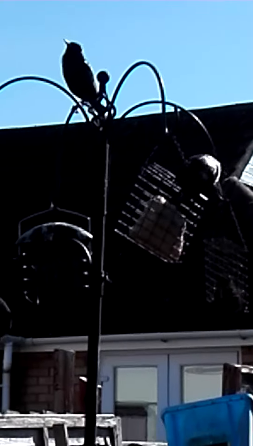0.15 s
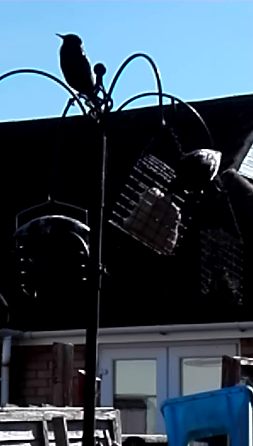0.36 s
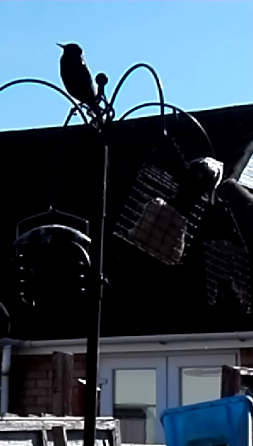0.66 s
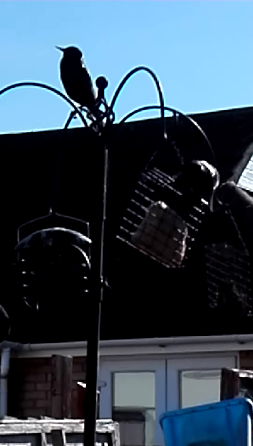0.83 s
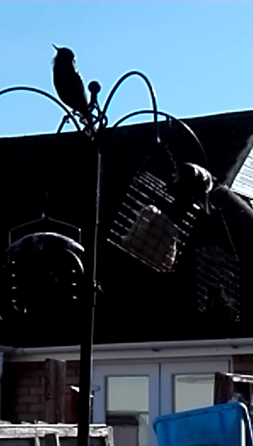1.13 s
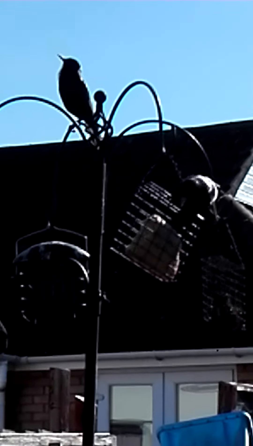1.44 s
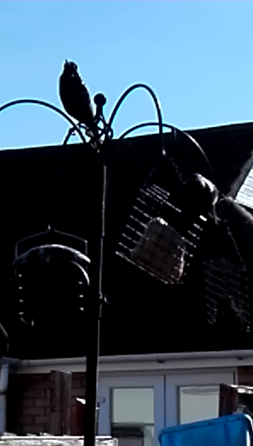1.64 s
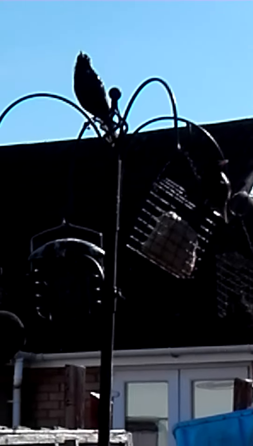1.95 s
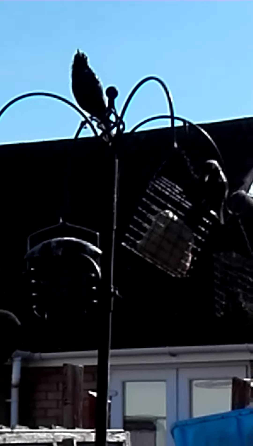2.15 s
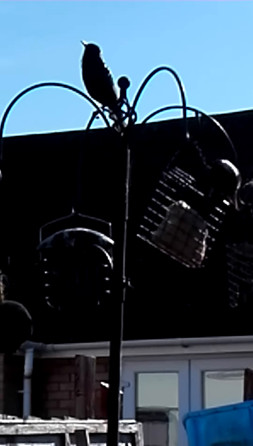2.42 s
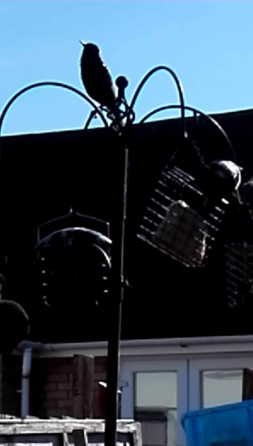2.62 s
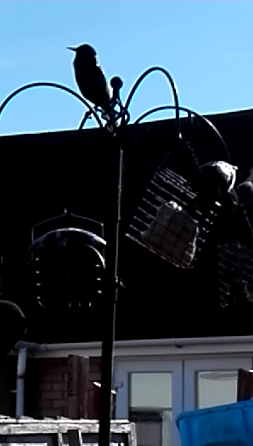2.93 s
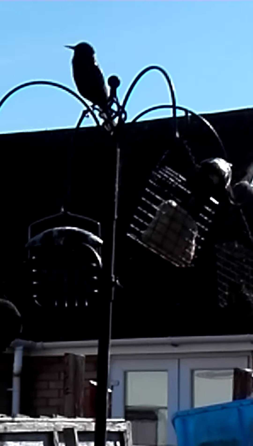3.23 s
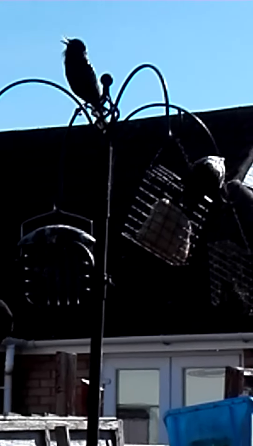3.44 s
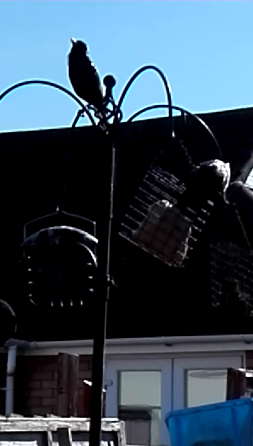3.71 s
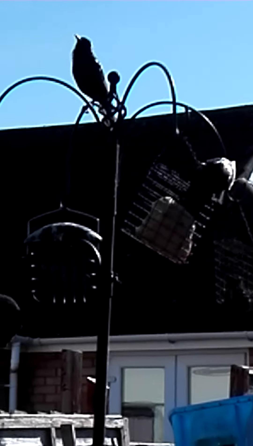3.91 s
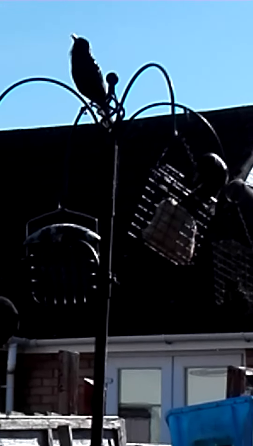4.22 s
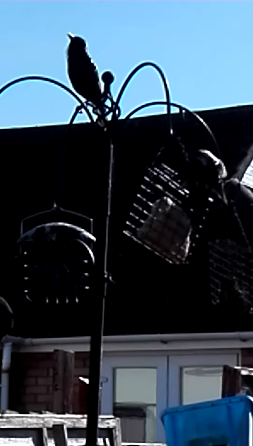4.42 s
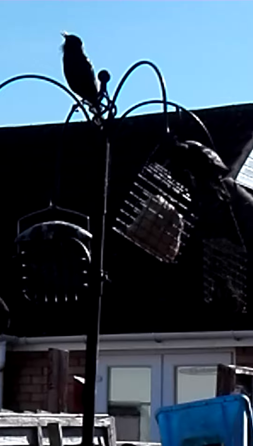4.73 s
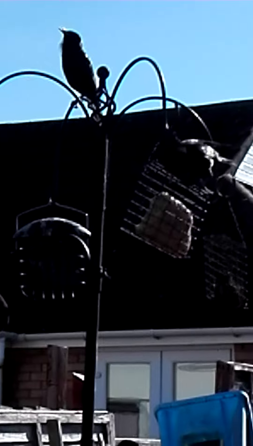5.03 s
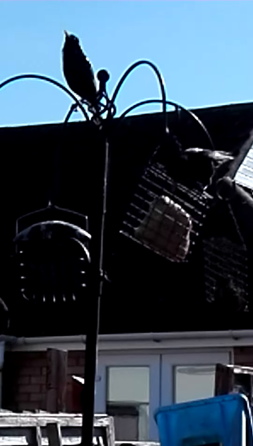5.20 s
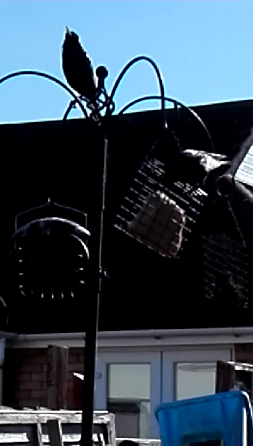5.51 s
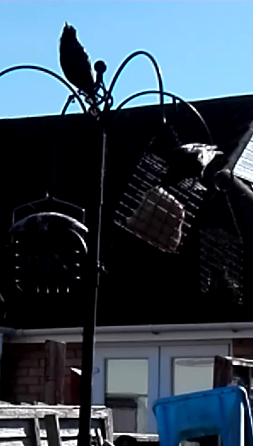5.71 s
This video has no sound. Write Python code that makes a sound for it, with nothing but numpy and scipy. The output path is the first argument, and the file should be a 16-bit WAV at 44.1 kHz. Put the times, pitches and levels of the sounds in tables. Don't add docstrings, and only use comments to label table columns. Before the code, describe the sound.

Sparse starling song outdoors: short chirps, a clear upward whistle, a long thin downward glide ending in dry rattle and a faint hoarse squawk.

```python
import sys
import numpy as np
from scipy import signal
from scipy.io import wavfile
from scipy.ndimage import uniform_filter1d

SR = 44100
rng = np.random.default_rng(int(sys.argv[2]) if len(sys.argv) > 2 else 0)


def how_loud(loudness_db):
    steps = np.asarray(loudness_db, float) / 20
    return 10 ** steps


def dump_mix(stems):
    frames = np.atleast_2d(stems).T
    limited = np.clip(frames, -1, 1)
    pcm = np.round(limited * 32767).astype(np.int16)
    wavfile.write(sys.argv[1], SR, pcm)


N = 258426

# (time [s], spread [s], peak level [dB])
GUSTS = [(0.0, 0.0094, -40), (.2, 0.068, -56.5), (.39, 0.014, -63.5), (.63, 0.036, -56), (.8, 0.033, -60),
         (.9, 0.015, -67), (1.12, 0.049, -58), (1.58, 0.061, -53), (1.97, 0.035, -57), (2.22, 0.025, -61.5),
         (2.5, 0.1, -57), (2.92, 0.045, -68), (3.16, 0.033, -59.5), (3.45, 0.051, -51.5),
         (3.68, 0.069, -59.5), (4.24, 0.072, -56.5), (4.45, 0.021, -65.5), (4.8, 0.054, -57),
         (4.93, .03, -57.5), (5.11, 0.033, -47), (5.24, 0.028, -62), (5.45, 0.053, -49.5),
         (5.56, 0.031, -43), (5.71, 0.027, -50.5), (5.86, 0.055, -53)]
# (time [s], level [dB])
BREEZE = [(0, -64.5), (3.9, -63), (4.6, -57), (5.86, -64.5)]
# (frequency [Hz], level [dB])
TOWN_HUM = [(76, -40.5), (130, -0.5), (280, -10.5), (578, -18), (1000, -12), (2290, -17), (5110, -15.5),
            (14200, -23.5)]
# (frequency [Hz], level [dB])
HISS = [(59, -39), (100, -11.5), (674, -19), (2200, -21.5), (2540, -7.5), (4830, -24.5), (5360, -5),
        (14200, -6.5)]
# (time [s], peak level [dB])
TICKS = [(0.0528, -69), (0.2538, -66), (0.5292, -70), (0.9707, -68), (1.278, -71), (1.3803, -66.5),
         (1.4825, -70), (1.6876, -70), (1.9949, -69), (2.097, -63), (2.7109, -69), (2.8135, -69),
         (2.917, -67), (3.3256, -68)]

# (time [s], pitch [Hz], level [dB])
LOWER_VOICE = [
    [(1.04, 1180, -78), (1.05, 1240, -59), (1.06, 1233, -56.5), (1.068, 1223, -65)],
    [(1.097, 1365, -57), (1.111, 1453, -70), (1.139, 1220, -58.5), (1.158, 1234, -65)],
    [(2.17, 1240, -93), (2.184, 1211, -70), (2.208, 1202, -52), (2.23, 1177, -67.5), (2.33, 1160, -76.5)],
]
# (time [s], pitch [Hz], level [dB])
UPPER_VOICE = [(1.052, 2830, -82), (1.064, 2850, -72), (1.079, 2950, -51), (1.086, 2920, -58),
               (1.093, 3050, -46), (1.102, 3060, -50), (1.114, 3060, -82)]
# (time [s], pitch [Hz], level [dB])
ARCH = [(1.99, 2490, -70.5), (2.062, 2830, -60.5), (2.088, 2945, -52.5), (2.122, 2796, -48.5),
        (2.132, 2771, -34), (2.149, 2714, -32), (2.156, 2668, -39.5), (2.172, 2590, -36.5),
        (2.18, 2530, -51)]
# (time [s], pitch [Hz], level [dB])
RISE = [(3.39, 3337, -73), (3.466, 3437, -35.5), (3.508, 3504, -29.5), (3.562, 3580, -46.5),
        (3.59, 3621, -35), (3.614, 3595, -34.5), (3.63, 3643, -42), (3.818, 3744, -58), (3.833, 3820, -94)]
# (time [s], pitch [Hz], level [dB])
DIVE = [(3.985, 9300, -59.5), (4.011, 9170, -48), (4.093, 8330, -48.5), (4.127, 8210, -44.5),
        (4.218, 7092, -51), (4.25, 6700, -61.5), (4.322, 6470, -62), (4.36, 6310, -75.5), (4.44, 6250, -62)]
GLIDE = [(4.456, 6140, -71.5), (4.518, 5720, -53), (4.559, 5530, -50), (4.632, 5450, -44),
         (4.682, 5336, -55.5), (4.719, 5225, -49.5), (4.957, 4517, -51.5), (5.052, 4213, -40.5),
         (5.1, 4231, -38)]
SINK = [(5.113, 4170, -48.5), (5.267, 3982, -46.5), (5.366, 3785, -50), (5.416, 3722, -43.5),
        (5.469, 3690, -54.5), (5.509, 3482, -42.5), (5.595, 3430, -40.5), (5.645, 3253, -40.5),
        (5.66, 3230, -68)]
FADE = [(5.661, 3238, -59), (5.687, 3170, -53), (5.713, 3156, -60), (5.771, 3234, -57.5),
        (5.805, 3050, -55), (5.859, 3050, -69)]
# (time [s], spread [s], peak level [dB])
OCTAVE = [(2.163, 0.025, -63.5), (3.45, .05, -79.5), (3.556, 0.041, -62.5), (3.74, 0.075, -75.5),
          (4.88, 0.17, -84.5), (5.26, 0.039, -69.5), (5.48, 0.075, -69.5), (5.668, 0.013, -62),
          (5.78, 0.077, -80)]
TWELFTH = [(2.146, 0.012, -86)]
HALF_ORDER = [(2.156, 0.023, -71.5)]

# (time [s], length [s], low edge [Hz], high edge [Hz], level [dB])
PUFFS = [
    (3.385, .05, 4000, 6200, -70),
    (1.27, .03, 3500, 6000, -78),
    (1.058, .012, 1700, 2500, -76),
    (1.835, .03, 1500, 6000, -78),
    (2.66, .2, 1000, 2200, -86),
    (5.69, .17, 1500, 3000, -76),
]
# (delay [s], level [dB])
ECHOES = [(.021, -21.5), (.047, -18.5), (.063, -22), (.13, -42)]
# (time [s], length [s], start pitch [Hz], end pitch [Hz], level [dB])
CHIRPS = [(1.10, .03, 2760, 2740, -69.5), (1.42, .02, 4350, 4300, -80), (1.72, .07, 4950, 4050, -79),
          (1.74, .04, 3500, 3300, -82), (1.90, .055, 4050, 4020, -79), (1.96, .045, 5000, 4950, -68),
          (2.655, .06, 4350, 4200, -72.5), (5.34, .07, 1750, 1720, -82), (5.612, .025, 5700, 5550, -71),
          (5.843, .03, 6050, 6000, -69), (1.78, .09, 4050, 3900, -83)]
CROAKS = [
    (1.095, .07, 1650, 1600, -76),
    (1.79, .11, 4400, 4300, -78),
    (1.88, .09, 3600, 3480, -78),
    (1.97, .035, 4700, 4500, -75),
    (4.7, .19, 2220, 2150, -85),
    (5.79, .07, 1750, 1700, -78),
]

# (time [s], beat rate [click pairs per s], ring pitch [Hz], level [dB])
MUTTER = [
    [(4.35, 55, 4300, -91), (4.52, 62, 4230, -79.5), (4.67, 53, 4150, -75)],
    [(4.68, 64, 3516, -69), (4.78, 60, 3230, -89), (4.88, 60, 3400, -75.5), (5.02, 53, 3550, -71.5),
     (5.1, 68, 3320, -82)],
]
# (time [s], beat rate [click pairs per s], ring pitch [Hz], level [dB])
RATTLE = [(5.105, 63, 5200, -66), (5.32, 64, 5150, -63), (5.4, 77, 4950, -62), (5.49, 78, 4750, -61.5),
          (5.52, 90, 4700, -61), (5.58, 90, 4600, -62), (5.605, 90, 4550, -70)]
CHURR = [(5.68, 95, 4250, -68), (5.72, 95, 4100, -65), (5.8, 92, 3900, -69), (5.859, 90, 4150, -66)]
THROAT_HZ = 3300, 5900
# (time [s], pitch [Hz], level [dB], beak opening [0-1])
SQUAWK = [(5.605, 829, -66, .2), (5.621, 737, -63.5, 0), (5.648, 739, -55.5, 0.83), (5.671, 707, -57, 0.79),
          (5.699, 734, -65.5, 1), (5.734, 690, -80, 0.7)]


def rms_one(x):
    return x / np.sqrt(np.mean(x ** 2) + 1e-20)


def in_time(rows):
    s, *columns = np.transpose(rows)
    return [np.interp(np.arange(N) / SR, s, column) for column in columns]


def gate(start, end, fade):
    t = np.arange(N) / SR
    to_nearest_edge = np.minimum(t - start, end - t)
    return np.sin(np.pi / 2 * np.clip(to_nearest_edge / fade, 0, 1)) ** 2


def drift(rate_hz):
    r = np.exp(-16 * np.pi * rate_hz / SR)
    noise = rng.standard_normal(N // 8 + 4002)
    slow = signal.lfilter([1], [1, -2 * r, r * r], noise)[4000:]
    return np.interp(np.arange(N) / 8, np.arange(len(slow)), rms_one(slow))


def swells(rows):
    t = np.arange(N) / SR
    return sum(how_loud(db) * np.exp(-.5 * ((t - s) / spread) ** 2) for s, spread, db in rows)


def band(x, low_hz, high_hz, order=2):
    edges = [low_hz, min(high_hz, .45 * SR)]
    return signal.sosfilt(signal.butter(order, edges, "band", fs=SR, output="sos"), x)


def coloured(spectrum, patchy_db):
    out = 0
    edges = 113 * 2 ** np.arange(0, 7.2, 1 / 3)
    white = rng.standard_normal((2, N))
    hz, level_db = np.transpose(spectrum)
    flickers = [how_loud(patchy_db * drift(14)) for group in range(5)]
    for k, (low, high) in enumerate(zip(edges, edges[1:])):
        centre_db = np.interp(np.log(low * high) / 2, np.log(hz), level_db)
        out = out + how_loud(centre_db) * flickers[k // 5] * band(white[k % 2], low, high)
    return rms_one(out)


def air_lumps(low_hz, high_hz, level):
    lumps = band(rng.standard_normal(N + SR), low_hz, high_hz)[SR:]
    power = uniform_filter1d(lumps ** 2, size=SR // 12)
    even = lumps / np.sqrt(power + 0.11 * np.mean(lumps ** 2))
    smooth = signal.butter(2, 1.62 * high_hz, fs=SR, output="sos")
    return signal.sosfiltfilt(smooth, level * rms_one(even))


def wind():
    rumble = how_loud(in_time(BREEZE)[0]) + swells(GUSTS)
    follows = .7
    flutter = how_loud(-73 + 6 * drift(5)) * (1000 * rumble) ** follows
    return air_lumps(19.8, 43.8, rumble * how_loud(1.0)) + air_lumps(47.1, 97.3, flutter * how_loud(-4))


def town_hum():
    return how_loud(-74.5) * coloured(TOWN_HUM, patchy_db=0.7)


def recorder_hiss():
    return how_loud(-82.5) * coloured(HISS, patchy_db=-1.2) * [[1], [-1]]


def ticks():
    clicks = np.zeros(N)
    for s, db in TICKS:
        clicks[int(s * SR):][:130] += how_loud(db + 7) * rng.standard_normal(130) * np.hanning(130)
    return band(clicks, 8600, 10200)


def whistle(note, waver, fading, overtones=()):
    out = np.zeros(N)
    start, end = note[0][0], note[-1][0]
    span = slice(int(start * SR), int(end * SR))
    hz, db = np.array(in_time(note))[:, span]
    phase = 2 * np.pi * np.cumsum(hz * (1 + waver * drift(87)[span])) / SR
    out[span] = how_loud(db) * np.sin(phase)
    for multiple, gain in overtones:
        out[span] += gain[span] * np.sin(multiple * phase)
    paths = np.abs(1 - fading * drift(56) ** 2)
    make_up = how_loud(11 * fading)
    return np.sqrt(2) * out * paths * make_up * gate(start, end, .005)


def starling_whistles():
    overtones = [(2, swells(OCTAVE)), (3, swells(TWELFTH)), (3 / 2, swells(HALF_ORDER))]
    chirps = sum(whistle(note, .006, .12) for note in LOWER_VOICE)
    chirps += whistle(UPPER_VOICE, .003, .08) + whistle(ARCH, .008, .08, overtones)
    rise = whistle(RISE, .001, .05, overtones)
    fall = whistle(DIVE + GLIDE[:1], .0015, .25)
    fall += whistle(GLIDE + SINK, .0015, .12, overtones)
    fall += whistle(FADE, .006, .3, overtones)
    return chirps + rise + fall


def puffs():
    out = np.zeros(N)
    for s, length, low_hz, high_hz, db in PUFFS:
        air = band(rng.standard_normal(4000), low_hz, high_hz, order=3)[1000:1000 + int(length * SR)]
        out[int(s * SR):][:len(air)] += how_loud(db) * rms_one(air) * np.hanning(len(air))
    return out


def garden(x):
    t = np.arange(SR // 2) / SR
    fade_60_db_s = 0.2
    scatter = rng.standard_normal(len(t)) * how_loud(-60 * t / fade_60_db_s) * (t > .008)
    response = how_loud(-15) * scatter / np.sqrt(np.sum(scatter ** 2))
    response[0] = 1
    for late, db in ECHOES:
        response[int(late * SR)] += how_loud(db)
    return signal.fftconvolve(x, response)[:N]


def far_birds():
    out = np.zeros(N)
    shake = drift(400)
    for calls, shake_hz in ((CHIRPS, 60), (CROAKS, 140)):
        for s, length, start_hz, end_hz, db in calls:
            at = np.arange(int(s * SR), min(int((s + length) * SR), N))
            hz = np.linspace(start_hz, end_hz, len(at)) + shake_hz * shake[at]
            tone = np.sin(2 * np.pi * np.cumsum(hz) / SR)
            out[at] += 2 * how_loud(db) * np.sqrt(np.hanning(len(at))) * tone
    return out * how_loud(2.3 * drift(40))


def rattle(rows, ring_s, sweep, breath, uneven_db):
    per_s, hz, db = in_time(rows)
    cycles = 2 * np.cumsum(per_s * (1 + .02 * drift(20))) / SR
    since = cycles % 1 / (2 * per_s)
    strength = np.where(cycles % 2 < 1, 1, .4)
    flick_hz = hz * (1 + sweep * (np.exp(-since / ring_s) - .4) + .025 * drift(60))
    shape = strength * since / ring_s * np.exp(1 - since / ring_s)
    clicks = shape * np.sin(2 * np.pi * np.cumsum(flick_hz) / SR)
    hoarse = np.sin(2 * np.pi * np.cumsum(hz * (1 + 0.09 * drift(900))) / SR)
    level = how_loud(db + uneven_db * drift(25))
    return level * (4 * clicks + breath * hoarse) * gate(rows[0][0], rows[-1][0], .01)


def starling_second_voice():
    mutter = sum(rattle(rows, .0012, sweep=.1, breath=.5, uneven_db=4) for rows in MUTTER)
    dry_rattle = rattle(RATTLE, .0006, sweep=.22, breath=.8, uneven_db=2.5)
    churr = rattle(CHURR, .0003, sweep=.5, breath=.5, uneven_db=3)
    return mutter + how_loud(0.5) * band(dry_rattle, *THROAT_HZ, order=4) + how_loud(-0.5) * churr


def squawk():
    hz, db, beak = in_time(SQUAWK)
    cycles = np.cumsum(hz * (1 + 0.018 * drift(200))) / SR
    pulses = np.diff(np.floor(cycles), prepend=0) * how_loud(4.3 * rng.standard_normal(N))
    low = rms_one(band(pulses, 1930, 2820, order=4))
    high = rms_one(band(pulses, 3700, 6600, order=6))
    return how_loud(db) * ((1 - beak) * low + beak * high) * gate(SQUAWK[0][0], SQUAWK[-1][0], 0.013)


def scene():
    birds = starling_whistles() + puffs() + far_birds() + starling_second_voice() + squawk()
    middle = wind() + town_hum() + ticks() + garden(birds)
    return middle + recorder_hiss()


def top_cut(x):
    return signal.sosfilt(signal.butter(12, 14350, fs=SR, output="sos"), x)


def record(dry):
    return top_cut(dry)


dry = scene()
out = record(dry)
dump_mix(out)
```